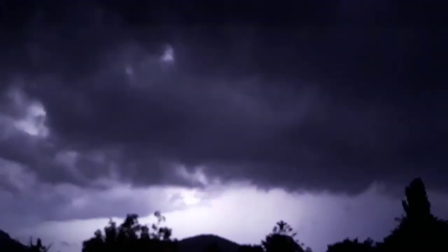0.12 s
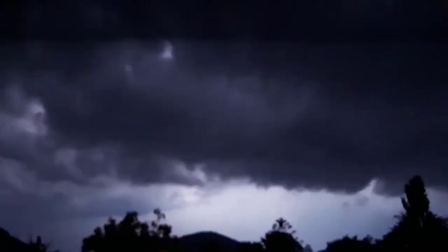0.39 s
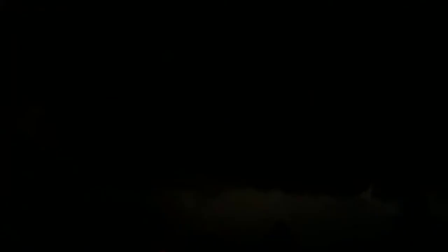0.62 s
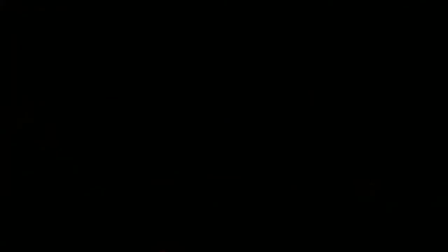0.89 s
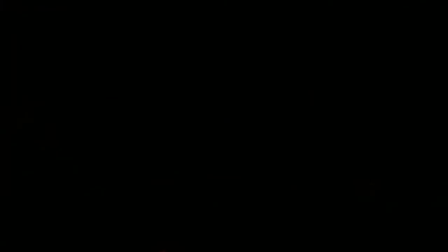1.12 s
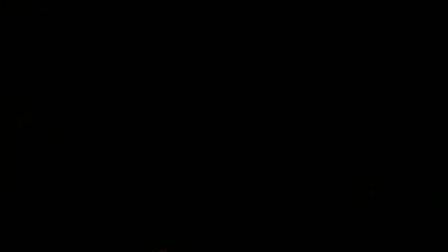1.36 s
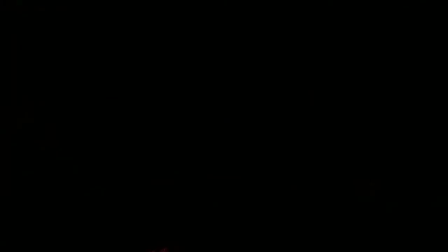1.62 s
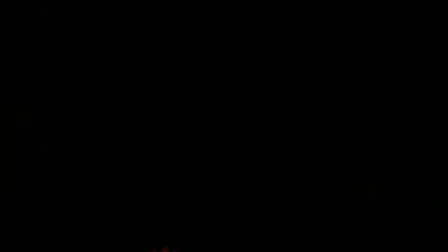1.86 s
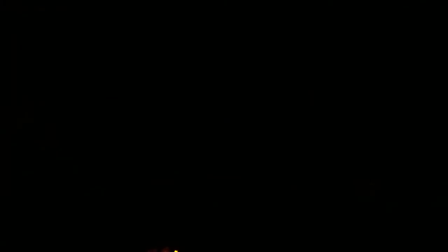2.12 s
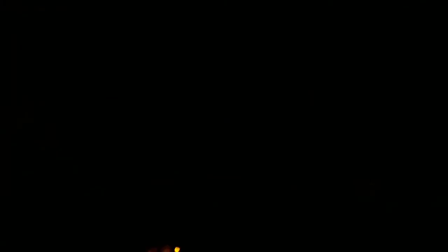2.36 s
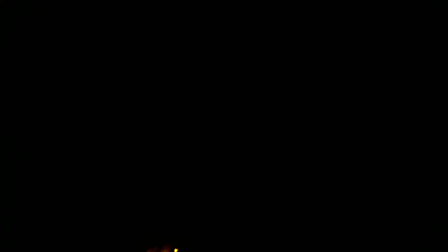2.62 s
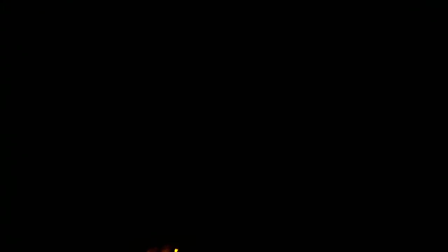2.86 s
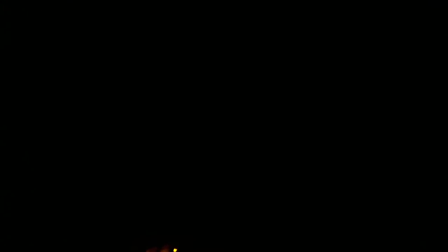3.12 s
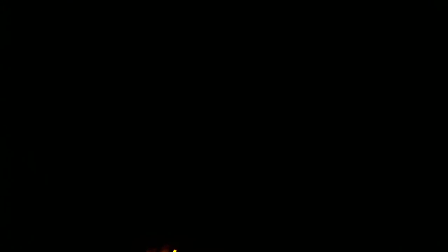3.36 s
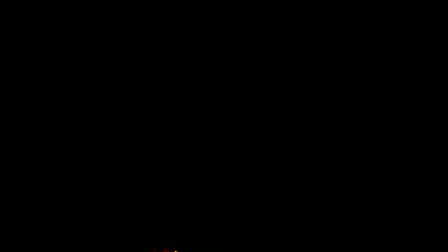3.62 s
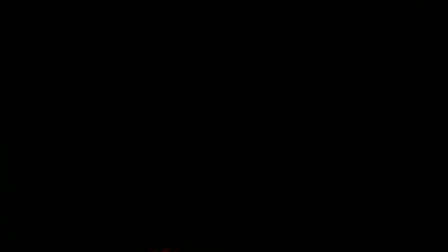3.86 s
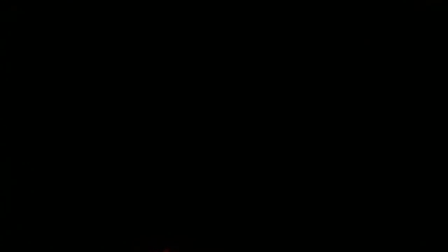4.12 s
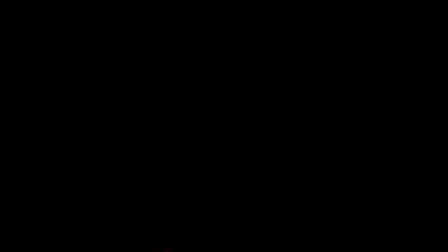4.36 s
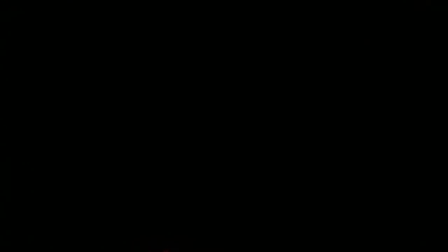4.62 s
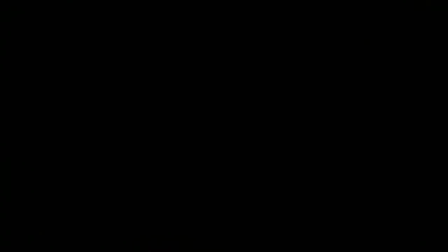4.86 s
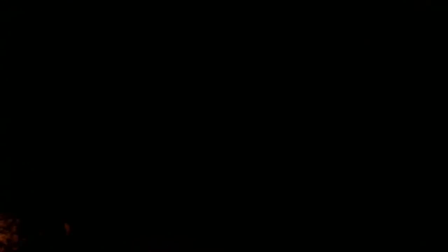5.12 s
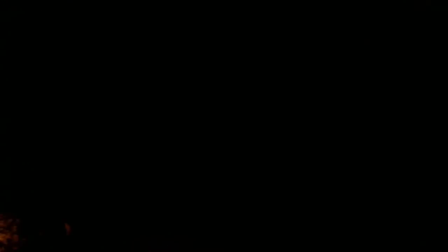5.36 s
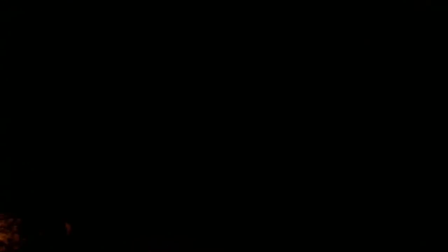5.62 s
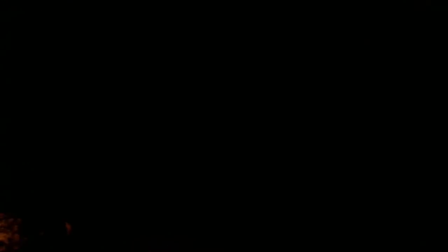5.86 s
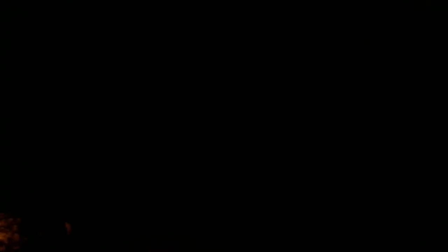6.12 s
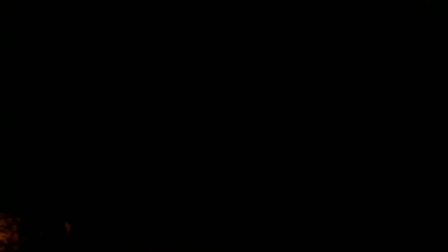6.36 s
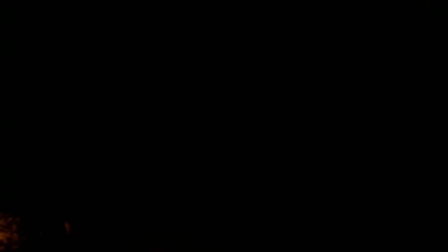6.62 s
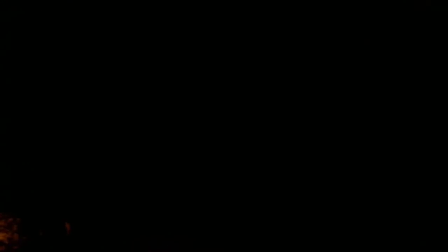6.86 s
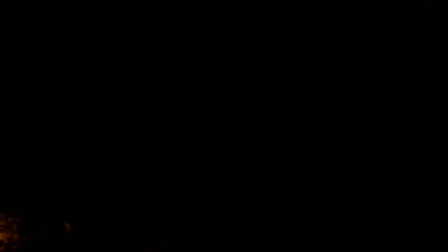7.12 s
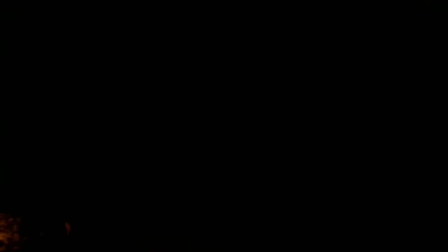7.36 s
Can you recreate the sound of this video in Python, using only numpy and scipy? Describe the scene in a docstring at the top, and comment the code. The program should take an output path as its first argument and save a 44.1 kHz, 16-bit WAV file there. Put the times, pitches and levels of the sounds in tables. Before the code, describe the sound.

Faint rain hiss, ticking drops and small watery spatters surround a dull, distant thunder rumble that dies down, swells again and sinks. A thin, high whistle sounds briefly near four and a half seconds. Soon a nearer peal erupts, far louder than everything before, crackling and booming in uneven waves over the drips, with slapping echoes near the end. The small microphone trims the deepest bass.

```python
"""Thunder rolls far off through rain hiss, close drops and spatters; a broad patter soon stops short.
Later a thin whistle passes in two short notes, then a nearer, brighter roll breaks in with hard claps,
low thumps and, near the end, fluttering slaps. Scattered shock fronts and noise, filtered into bands,
make the rumble; filtered noise and ticks make the rain; gliding sines make the puddle plinks and whistle.
A small microphone cuts the deepest bass."""
import sys
import numpy as np
from scipy import signal
from scipy.fft import rfft, irfft, next_fast_len
from scipy.io import wavfile
from scipy.ndimage import uniform_filter1d, map_coordinates

SR = 44100
rng = np.random.default_rng(int(sys.argv[2]) if len(sys.argv) > 2 else 0)


def invert_db(level):
    """Linear amplitude ratio for a level in decibels (20 dB per decade), elementwise."""
    return 10 ** (np.asarray(level, dtype=float) / 20)


def persist_wave(psi):
    """Save psi, clipped to +-1, as 16-bit WAV."""
    counts = np.round(np.clip(psi, -1, 1) * 32767).astype(np.int16)
    wavfile.write(sys.argv[1], SR, np.atleast_2d(counts).T)


N = 329868

# The blurred rumble under the peals, before random drift.
# Each row: time in seconds, boom level in dB, crackle level in dB relative to the boom.
ROLL = [(0, -39, -12.5), (.2, -39, -16.5), (.37, -39.5, -17), (.8, -41.5, -17), (1.15, -45, -13),
        (1.3, -47.5, -19), (1.85, -49.5, -9.5), (2.1, -50.5, -11.5), (2.5, -39.5, -14.5),
        (2.9, -41.5, -14.5), (3.25, -47, -16), (4.15, -48.5, -11.5), (4.5, -46.5, -14.5), (4.8, -48, -15),
        (5.05, -47, -16.5), (5.29, -43.5, -14), (5.45, -29, -14), (5.6, -27.5, -11), (5.85, -27, -12),
        (6.02, -29, -13), (6.17, -29, -6.5), (6.4, -29.5, -11.5), (6.6, -33.5, -7), (6.85, -34, -9.5),
        (7.1, -24.5, -8), (7.35, -32.5, -6), (7.48, -29, -7.5)]
# Peals, one stretch of the channel each. Each row: crest time in seconds, boom level in dB, body and crackle
# levels in dB relative to the boom, seconds to fall 10 dB once the hold is over.
# A negative fall time turns the peal round: a slow swell, then a quick drop.
PEALS = [(.44, -29.5, -8, -24, 0.0945), (1.46, -42, -1.5, -9, 0.32), (1.64, -41, -9, -22, -0.05),
         (2.02, -39.5, -2, -17, 0.35), (2.69, -32, -2.5, -26, 0.0548), (3.42, -41, -3, -9.5, 0.3),
         (3.72, -40, -0.5, -4, 0.16), (5.105, -41, -3.5, -21, -0.1), (5.24, -43.5, -4, -20, 0.25),
         (5.33, -32.5, -9, -7.5, 0.1), (5.585, -30, -8, -4.5, 0.13), (5.678, -25, -2.5, -6, 0.12),
         (6.072, -29.5, 5, -2.5, 0.09), (6.197, -24.5, 0.6, -5.5, 0.09), (6.29, -25, -3.5, -9, 0.18),
         (6.67, -33, 1.5, -7.5, 0.35), (6.76, -31, -1, -6.5, 0.2), (6.895, -24.5, 0.5, -13.5, 0.17),
         (7.025, -24, -2.5, -6, 0.08), (7.17, -23.5, -1, -14.5, 0.12), (7.419, -22, -2, -16.5, 0.24)]
# Rise and hold of a peal as shares of its fall time.
FAR_RISE, NEAR_RISE, HOLD = 0.47, 0.28, 0.3
NEAR_ROLL_S = 5.3  # the nearer stretch of the channel is first heard
BOOM_LAG_S = 0.01  # the boom crests after the crackle
ROLL_BODY_DB = -3  # body of the rumble relative to its boom

# Tone of the near boom. Each row: frequency in Hz, relative level in dB per Hz.
NEAR_BOOM_TONE = [(22, -41), (38, -24.5), (60, -10), (76, -3), (92, 0.5), (110, -4), (150, -3.5),
                  (185, -15), (230, -31), (400, -120)]
# Tone of the far boom. Each row: frequency in Hz, relative level in dB per Hz.
FAR_BOOM_TONE = [(22, -30), (38, -20), (60, -8.5), (76, -4.5), (92, 1), (115, -9), (150, -0.5), (185, -15),
                 (230, -33.5), (400, -120)]
# Tone of the thunder's body. Each row: frequency in Hz, relative level in dB per Hz.
BODY_TONE = [(110, -29.5), (180, 0.5), (290, 1), (400, -13.5), (520, -28), (880, -120)]
# Tone of the near crackle. Each row: frequency in Hz, relative level in dB per Hz.
NEAR_CRACKLE_TONE = [(240, -33.5), (400, -1.5), (644, -6.5), (935, -15.5), (1850, -35), (2300, -53),
                     (2990, -62), (5060, -120)]
# Crackle dulled by kilometres of air. Each row: frequency in Hz, relative level in dB per Hz.
FAR_CRACKLE_TONE = [(240, -25.5), (400, 1), (611, -6), (900, -23), (1170, -56), (1980, -120)]

# Hard single fronts. Each row: start in seconds, level in dB before the air blunts it,
# front scale in ms (pressure turns to suction after three quarters of it).
CLAPS = [(5.682, -13, 0.95), (5.691, -13, 0.9), (6.047, -20.5, 0.98), (6.076, -14.5, 0.9),
         (6.879, -18, 1.1), (7.019, -16, 1.3)]
# The yard booming under the hardest arrivals.
# Each row: start in seconds, level in dB before shaping, centre pitch in Hz, length scale in seconds.
THUMPS = [(0.458, -31.5, 91, 0.065), (1.63, -33, 150, 0.083), (2.005, -34, 71, 0.044),
          (2.155, -30.5, 88, .04), (2.355, -30, 86, 0.027), (2.695, -27, 70, 0.036),
          (5.655, -14, 96.7, 0.098), (6.092, -14, 107.4, 0.054), (6.2, -16.5, 207, 0.024),
          (7.019, -8, 94, 0.028), (7.105, -16, 92.3, 0.1), (7.429, -15.5, 119, 0.02)]
THUMP_RISE_S, THUMP_WAVER = 0.0071, 0.099  # onset; random pitch drift as a share
# Fronts slapping to and fro between nearby walls.
# Each row: first slap in seconds, level in dB before shaping, length scale in seconds.
FLUTTERS = [(6.88, -14.5, 0.023), (6.933, -21, 0.017), (7.065, -15, 0.037)]
FLUTTER_HZ = 94.8  # slaps a second
# Relative level in dB of each multiple of the slap rate.
FLUTTER_OVERTONES_DB = [2, -4, -0.3, -12]

# Close drops. Each row: start in seconds, splash level in dB, spit level in dB, both before their decays.
DROPS = [(0.201, -56, -53.5), (.4444, -72, -57), (0.668, -53, -60), (.813, -51.5, -54), (2.039, -51.5, -56),
         (2.966, -52.5, -59), (3.7984, -58.5, -51.5), (4.1035, -55.5, -59), (4.4682, -62.5, -61),
         (4.7222, -56, -57), (4.9043, -56, -66.5), (5.7369, -57, -56.5), (6.3699, -55, -60.5),
         (6.4508, -58, -69), (6.7033, -48, -61), (7.06, -52, -54)]
# The clearest fine drops. Each row: start in seconds, starting rms level in dB.
TICKS = [(.2004, -53), (.4444, -50.5), (.6799, -52), (.8145, -55), (2.0378, -59), (2.5331, -54),
         (3.0365, -61), (3.3253, -52), (3.8018, -57), (3.9764, -55), (4.4682, -53), (5.3787, -56),
         (6.4512, -52), (6.7027, -55)]
TICK_HZ, TICK_T60_S = 12500, 0.024  # centre of the band, before random spread; time to fall 60 dB
# Bubbles in puddles, before pitch waver.
# Each row: start in seconds, first pitch in Hz, last pitch in Hz, peak level in dB, length in seconds.
PLINKS = [(0.645, 780, 900, -56.5, 0.028), (.668, 930, 1170, -58, .042), (2.858, 3660, 3770, -60, 0.018),
          (4.03, 3490, 3640, -58.5, 0.04), (4.298, 4300, 4450, -57, .02)]
# Two whistled notes, before waver. Each row of a note: time in seconds, pitch in Hz, level in dB.
WHISTLE = [
    [(4.458, 3010, -63), (4.48, 3000, -58), (4.495, 2990, -64)],
    [(4.505, 2600, -66), (4.545, 2590, -57), (4.565, 2780, -65), (4.585, 3010, -57), (4.605, 3000, -61),
     (4.63, 2650, -67), (4.655, 2590, -60), (4.69, 2430, -64)],
]

# Steady rain, before gusts. Each row: time in seconds, hiss level in dB, trickle level in dB relative to the hiss.
RAIN = [(0, -57, -4.5), (1.12, -57, -4), (1.17, -63, -6), (1.6, -63, -3), (2.44, -62, -3),
        (4.37, -61, -3.5), (5.06, -61, -2), (5.79, -59.5, 1.5), (6.44, -59, -6), (7.48, -59, -9)]
# Runs of water shaken onto nearby surfaces.
# Each row: start in seconds, starting patter level in dB, seconds to fall 60 dB.
SPATTERS = [(0.109, -55.5, 0.29), (2.79, -58, 0.22), (2.969, -53.5, 0.13), (2.988, -51.5, 0.23),
            (3.44, -61, 0.11), (3.49, -56, 0.36), (4.102, -53, 0.21), (4.369, -57, 1.1), (4.901, -57, .7),
            (6.28, -50, 1.1), (7.06, -53.5, 1.9)]
SPATTER_TREBLE_DB = -5  # treble of a spatter relative to its patter
SHOWER_ENDS_S, SHOWER_DB = 1.196, -63.5  # a broader patter stops abruptly; level before gusts
# Tone of the rain hiss. Each row: frequency in Hz, relative level in dB per Hz.
HISS_TONE = [(1290, -12.5), (2200, -4.5), (2830, -5), (3300, -1), (5120, -1), (6430, -7.5), (8680, -4.5),
             (10000, -11), (11300, -12.5), (14200, -7.5), (14900, -9), (15500, -27), (16000, -51)]
# Tone of the shower and spatters. Each row: frequency in Hz, relative level in dB per Hz.
PATTER_TONE = [(530, -21), (900, 0.5), (1500, 0.5), (1960, 1), (2300, -5.5), (2900, -7.5), (3600, -24),
               (5720, -120)]
# Tone of the steady near trickle. Each row: frequency in Hz, relative level in dB per Hz.
TRICKLE_TONE = [(600, -20.5), (900, -8.5), (1100, -7), (1450, -7), (1900, -4.5), (2150, -11), (2500, -13.5),
                (3400, -59.5)]


def unit(x):
    """Scaled to rms 1."""
    return x / np.sqrt(np.mean(x ** 2) + 1e-20)


def curves(rows):
    """One value per sample for each column after the time."""
    s, *cols = np.transpose(rows)
    return [np.interp(np.arange(N) / SR, s, c) for c in cols]


def wobble(rate):
    """A smooth random curve, rate knots a second."""
    knots = rng.standard_normal(int(N * rate / SR) + 4)
    return map_coordinates(knots, [np.arange(N) * rate / SR])


def coloured(x, tone):
    """x through a causal minimum-phase filter with the given tone, rms 1."""
    m = 2 * next_fast_len(N // 2 + SR // 4)
    hz, db = np.transpose(tone)
    bins = np.fft.rfftfreq(m, 1 / SR)
    gain = invert_db(np.interp(np.log(bins + 1), np.log(hz + 1), db))
    cepstrum = irfft(np.log(gain + 1e-6), m)
    # Folding the cepstrum forward in time makes the filter causal.
    cepstrum[1:m // 2] *= 2
    cepstrum[m // 2 + 1:] = 0
    return unit(irfft(rfft(x, m) * np.exp(rfft(cepstrum)), m)[:N])


def fronts(per_second, spread_db):
    """Impulses at random moments, a few much larger than the rest, rms 1."""
    at, size, sign = rng.random((3, N))
    strength = invert_db(-spread_db * np.log(size + 0.03))
    return unit((at < per_second / SR) * strength * np.sign(sign - 0.5))


def steady(x, span):
    """x with its chance swells slower than span seconds partly evened out, rms 1."""
    power = np.abs(uniform_filter1d(x * x, int(span * SR)))
    return unit(x / np.sqrt(power + 0.35))


def patchy(x, patchy_db):
    """x with random louder and quieter patches over time and frequency, rms 1."""
    z = signal.stft(x, nperseg=1024)[2]
    field = uniform_filter1d(rng.standard_normal(z.shape), size=9, axis=0)
    field = uniform_filter1d(field, size=12, axis=1)
    return unit(signal.istft(z * invert_db(patchy_db * unit(field)), nperseg=1024)[1][:N])


def thunder():
    """Direct shock fronts strike all bands at once; echoes from hills and cloud blur them into noise."""
    boom_db, crackle_db = curves(ROLL)
    boom_db = boom_db + 1.44 * wobble(5)
    _, crest_db, crest_body_db, crest_crackle_db, _ = np.transpose(PEALS)
    direct = fronts(300, spread_db=1.0)

    def arrive(blur, tone, span):
        return steady(coloured(direct + blur * rng.standard_normal(N), tone), span)

    since = np.arange(N) / SR - NEAR_ROLL_S
    arrived = np.clip(since / 0.025, 0, 1)
    # Brightens as the closest part arrives; later sound comes from further up the channel.
    near = arrived * np.clip(np.minimum(0.44 + 2.25 * since, 1.05 - 0.13 * since), 0, 1)

    boom = arrived * arrive(3.5, NEAR_BOOM_TONE, span=0.087)
    boom += (1 - arrived) * arrive(1.95, FAR_BOOM_TONE, span=0.057)
    boom *= peals(boom_db + wobble(11), crest_db, BOOM_LAG_S)

    body = arrive(4.3, BODY_TONE, span=0.12)
    body *= peals(boom_db + ROLL_BODY_DB + wobble(13), crest_db + crest_body_db)

    crackle = near * arrive(1.97, NEAR_CRACKLE_TONE, span=0.062)
    crackle += np.sqrt(1 - near ** 2) * arrive(6.7, FAR_CRACKLE_TONE, span=0.049)
    bunching_db = 1.44 * wobble(22)  # bends of the channel bunch the sharper arrivals
    crackle *= invert_db(bunching_db) * peals(boom_db + crackle_db, crest_db + crest_crackle_db)
    return boom + body + crackle


def peals(bed_db, crests_db, lag_s=0):
    """Gain of one thunder layer: the rumble plus each peal's rise, hold and fall, added as power."""
    t = np.arange(N) / SR - lag_s
    power = invert_db(bed_db) ** 2
    for (s, *_, fall_s), db in zip(PEALS, crests_db):
        rise_s = fall_s * (NEAR_RISE if s > NEAR_ROLL_S else FAR_RISE)
        slope = np.maximum((s - t) / rise_s, (t - s) / fall_s - HOLD)
        power = power + invert_db(db - 10 * np.maximum(slope, 0)) ** 2
    return np.sqrt(power)


def claps():
    """Single hard fronts: a pressure rise and its suction with a scattered tail, blunted by the air."""
    out, t = np.zeros(N + SR), np.arange(SR // 4) / SR
    rough = wobble(120)
    for s, db, front_ms in CLAPS:
        i = round(s * SR)
        u = t * 4000 / front_ms
        front = u * u * (3 - u) * np.exp(-u)
        tail = invert_db(4.6 * rough[i:][:len(t)] - 60 * t / 0.23) * (1 - np.exp(-t / 0.0035))
        scatter = 0.1 * tail * rng.standard_normal(len(t))
        out[i:][:len(t)] += invert_db(db) * (front + scatter)
    air = signal.butter(5, 1800, fs=SR, output="sos")
    return signal.sosfilt(air, out)[:N]


def thumps():
    """A few cycles of low ringing that start fast, hold and stop."""
    out = np.zeros(N + SR)
    drift = np.pad(wobble(40), (0, SR))
    for (s, db, hz, length), phase in zip(THUMPS, rng.random(len(THUMPS))):
        t, i = np.arange(int(2 * length * SR)) / SR, round(s * SR)
        shape = (1 - np.exp(-t / THUMP_RISE_S)) * np.exp(-(t / length) ** 4)
        pitch = hz * (1 + THUMP_WAVER * drift[i:][:len(t)])
        out[i:][:len(t)] += invert_db(db) * shape * np.sin(2 * np.pi * (phase + np.cumsum(pitch) / SR))
    return out[:N]


def flutters():
    """Short trains of suction pulses at an even spacing, built from multiples of the slap rate."""
    out, lead = np.zeros(N + SR), round(SR / FLUTTER_HZ / 2)
    for s, db, length in FLUTTERS:
        t = np.arange(int(2 * length * SR)) / SR
        slaps = 0
        for k, level in enumerate(FLUTTER_OVERTONES_DB, start=1):
            slaps = slaps + invert_db(level) * np.cos(2 * np.pi * k * FLUTTER_HZ * (t - lead / SR))
        shape = (1 - np.exp(-t / 0.004)) * np.exp(-(t / length) ** 4)
        out[round(s * SR) - lead:][:len(t)] -= invert_db(db) * shape * slaps
    return out[:N]


def drops():
    """A close drop: a dull splash that lingers and a bright spit soon gone; fine drops only tick."""
    out, t = np.zeros(N + SR), np.arange(SR // 4) / SR
    f = np.fft.rfftfreq(len(t), 1 / SR) + 1

    def band(hz, octaves):
        bell = np.exp(-(np.log2(f / hz) / octaves) ** 4)
        return unit(irfft(rfft(rng.standard_normal(len(t))) * bell, len(t)))

    for s, splash_db, spit_db in DROPS:
        splash = invert_db(splash_db) * band(3100, 1.0) * (invert_db(-60 * t / 0.11) + 0.1 * invert_db(-60 * t / 0.0065))
        spit = invert_db(spit_db) * band(7250, 0.57) * (invert_db(-60 * t / 0.084) + 0.28 * invert_db(-60 * t / 0.0115))
        out[round(s * SR):][:len(t)] += splash + spit
    for (s, db), pitch in zip(TICKS, rng.random(len(TICKS))):
        tick = band(TICK_HZ * (0.9 + 0.2 * pitch), 0.72)
        out[round(s * SR):][:len(t)] += invert_db(db - 60 * t / TICK_T60_S) * tick
    return out[:N]


def plinks():
    """Drops into puddles trap a bubble whose pitch rises."""
    out, waver = np.zeros(N), wobble(250)
    for s, from_hz, to_hz, db, length in PLINKS:
        i = round(s * SR)
        u = np.linspace(0, 1, int(length * SR))
        pitch = (from_hz + (to_hz - from_hz) * u) * (1 + 0.021 * waver[i:][:len(u)])
        out[i:][:len(u)] += invert_db(db) * np.sin(np.pi * u) * np.sin(2 * np.pi * np.cumsum(pitch) / SR)
    return out


def whistle():
    """A thin, faint whistle: a wavering sine near the hiss level, smeared by echoes."""
    out, t = np.zeros(N), np.arange(N) / SR
    for note in WHISTLE:
        hz, db = curves(note)
        edge = np.clip(np.minimum(t - note[0][0], note[-1][0] - t) / 0.0049, 0, 1)
        level = np.sqrt(2) * edge * invert_db(db) * (0.75 + 0.22 * wobble(90))
        out += level * np.sin(2 * np.pi * np.cumsum(hz + 45 * wobble(110)) / SR)
    echoes = invert_db(-60 * t[:SR // 4] / 0.4) * rng.standard_normal(SR // 4)
    echoes /= np.linalg.norm(echoes)
    return 0.85 * out + 0.6 * signal.fftconvolve(out, echoes)[:N]


def rain():
    """Far rain is a smooth hiss with small ticks; nearer surfaces add a steady trickle and sudden spatters."""
    hiss_db, trickle_db = curves(RAIN)
    gust, t = wobble(9), np.arange(N) / SR

    def spray(ticks):
        return rng.standard_normal(N) + ticks * fronts(90, spread_db=3.5)

    def burst(s, db, t60):
        return (t >= s) * invert_db(db - 60 * np.abs(t - s) / t60)

    hiss_power = invert_db(hiss_db + gust + 0.86 * wobble(30)) ** 2
    spatter_gain = invert_db(SHOWER_DB + gust) * np.clip((SHOWER_ENDS_S - t) / 0.027, 0, 1)
    for s, db, t60 in SPATTERS:
        hiss_power += burst(s, db + SPATTER_TREBLE_DB, t60) ** 2
        spatter_gain += burst(s, db, t60)

    hiss = np.sqrt(hiss_power) * patchy(coloured(spray(0.33), HISS_TONE), patchy_db=1.3)
    trickle = patchy(coloured(spray(0.11), TRICKLE_TONE), patchy_db=1.3)
    trickle *= invert_db(hiss_db + trickle_db + gust + wobble(13))
    spatter = spatter_gain * coloured(spray(0.57), PATTER_TONE)
    return hiss + trickle + spatter


def scene():
    """All sources at one microphone; the sound ends mid-roll, with the thunder closed without a click."""
    closing = np.clip(np.arange(N)[::-1] / (0.008 * SR), 0, 1)  # short 8 ms ramp
    storm = closing * (thunder() + claps() + thumps() + flutters())
    return (storm + drops() + plinks() + whistle() + rain())[None]


def band_limit(x):
    """A steep low-pass at the top of the band."""
    return signal.sosfilt(signal.butter(12, 15950, fs=SR, output="sos"), x)


def record(dry):
    """The small microphone drops the deepest bass, below about 30 Hz."""
    microphone = signal.butter(2, 30, "highpass", fs=SR, output="sos")
    mix = signal.sosfilt(microphone, dry)
    return band_limit(mix)


dry = scene()
out = record(dry)
persist_wave(out)
```